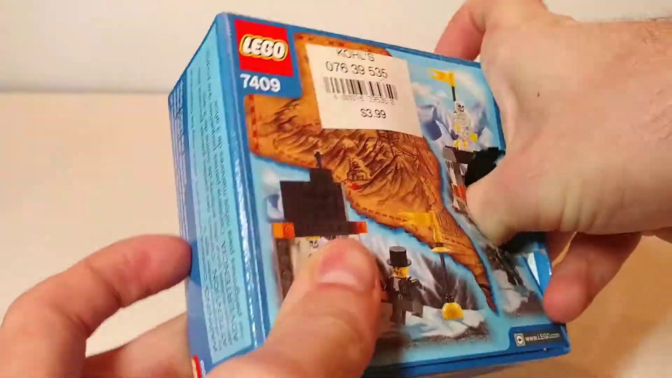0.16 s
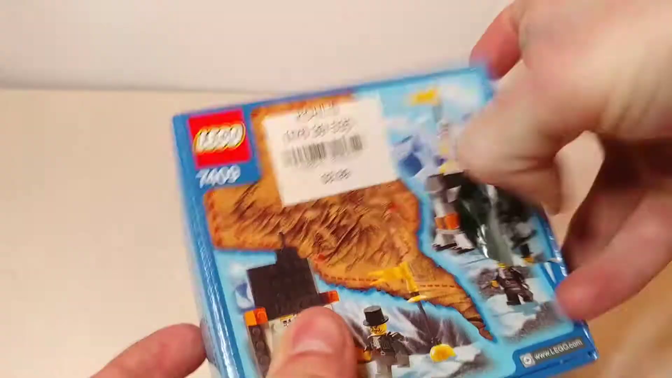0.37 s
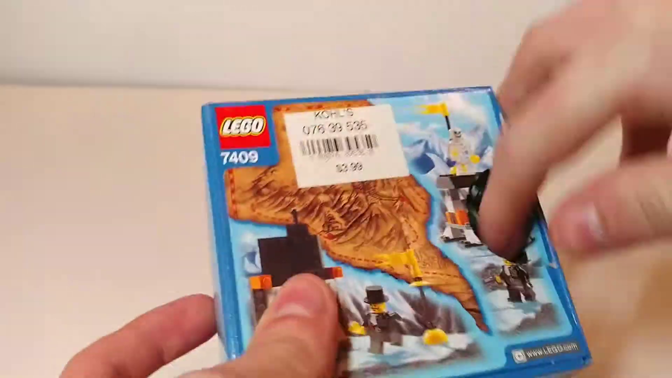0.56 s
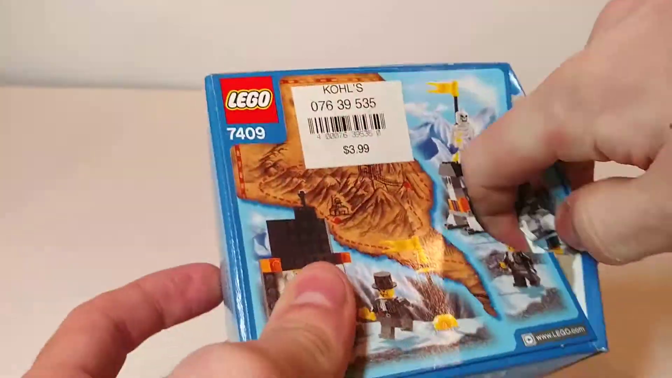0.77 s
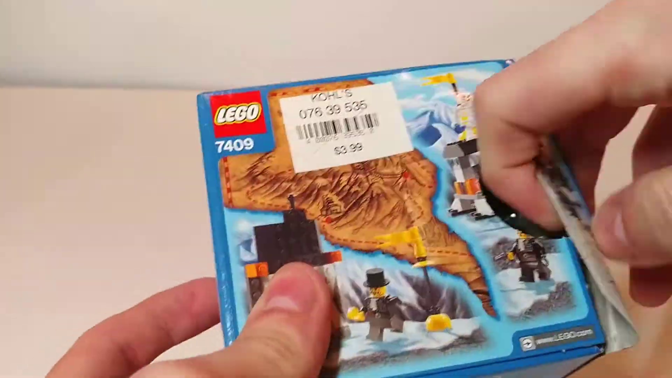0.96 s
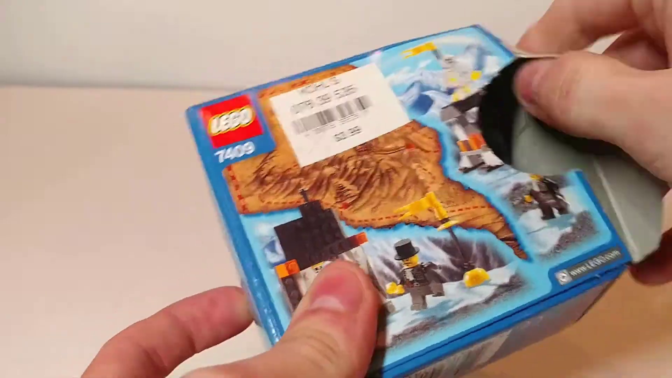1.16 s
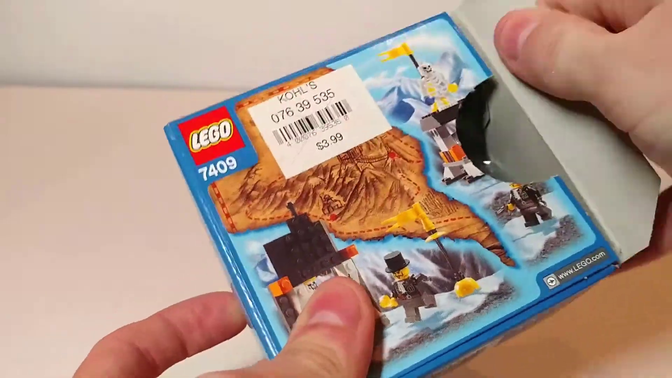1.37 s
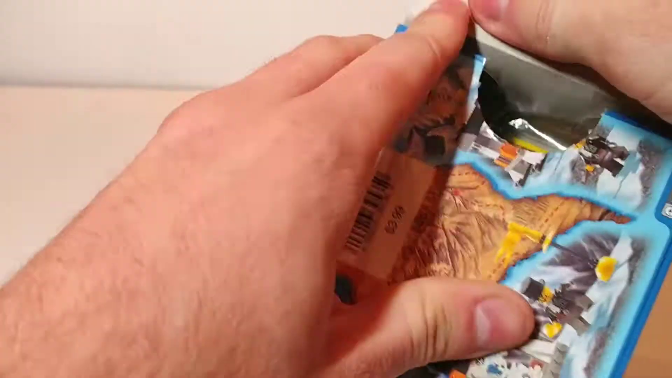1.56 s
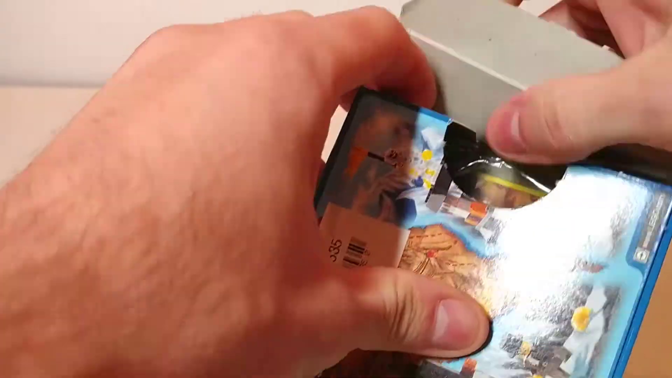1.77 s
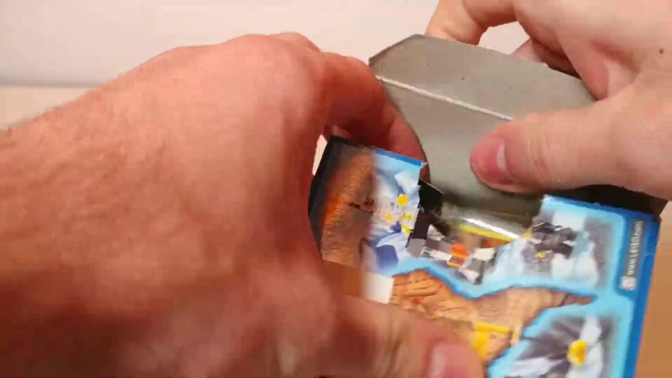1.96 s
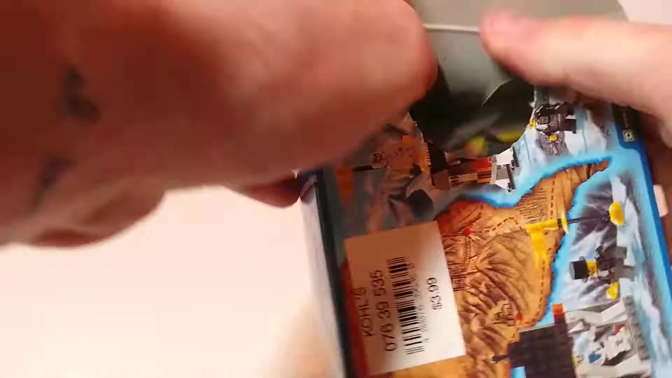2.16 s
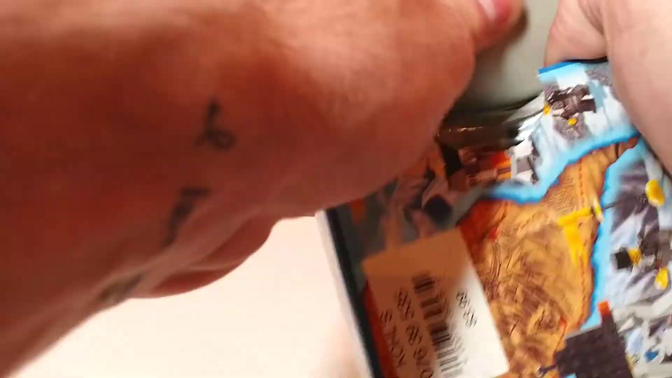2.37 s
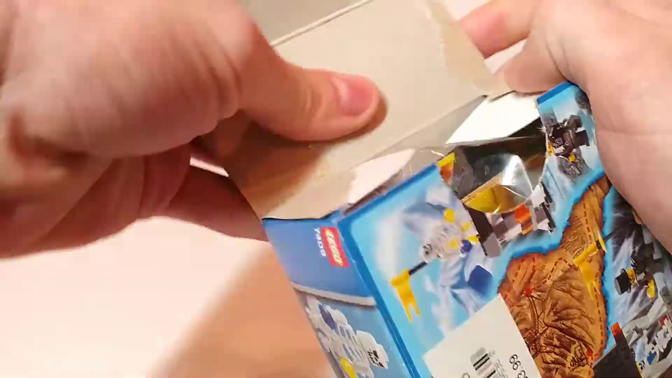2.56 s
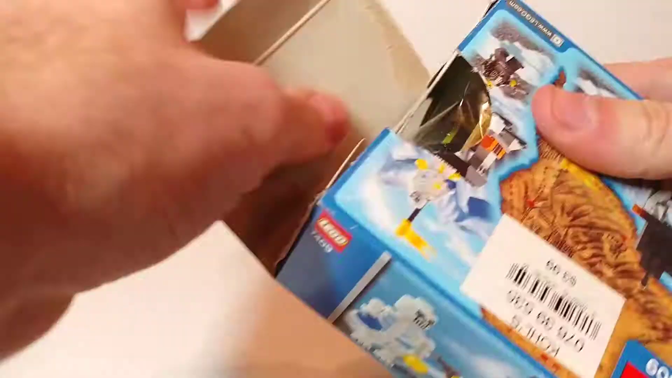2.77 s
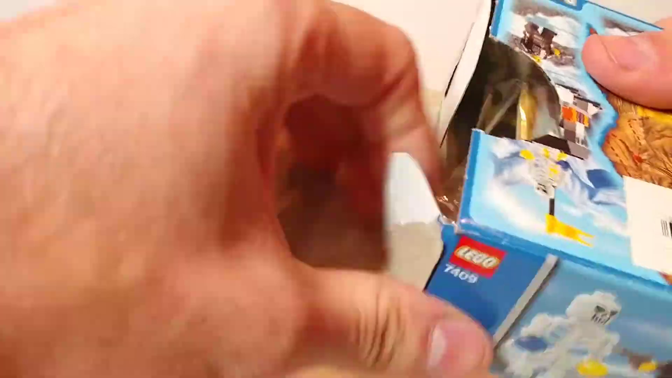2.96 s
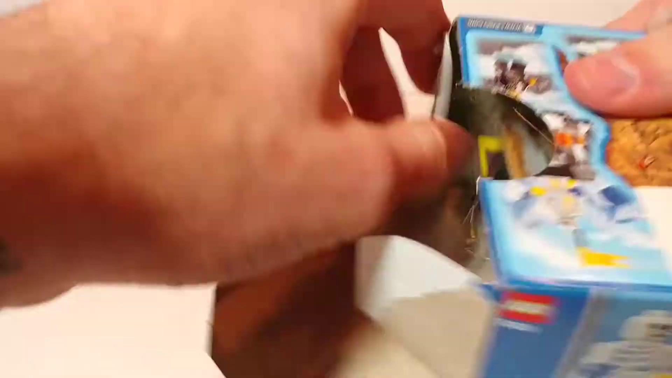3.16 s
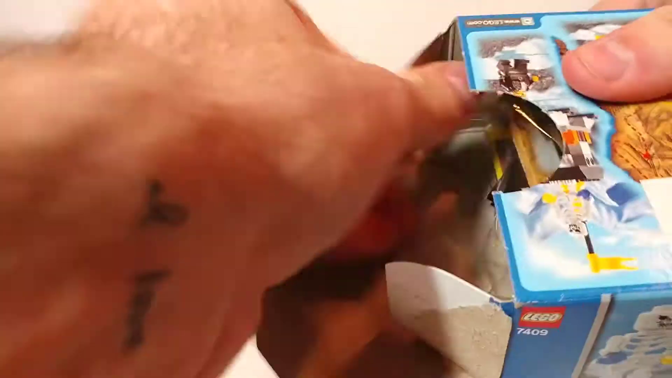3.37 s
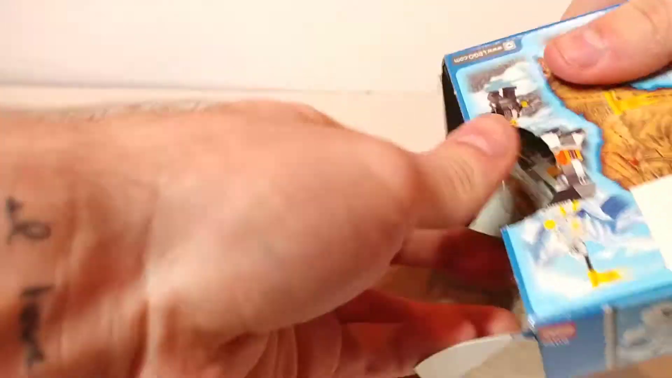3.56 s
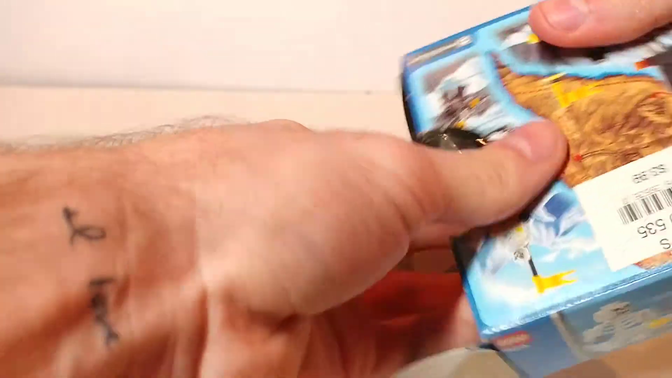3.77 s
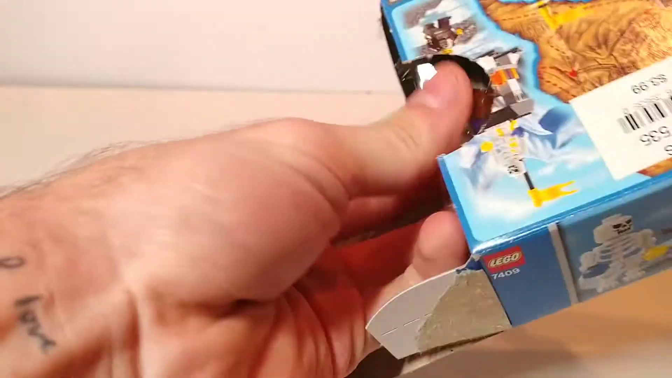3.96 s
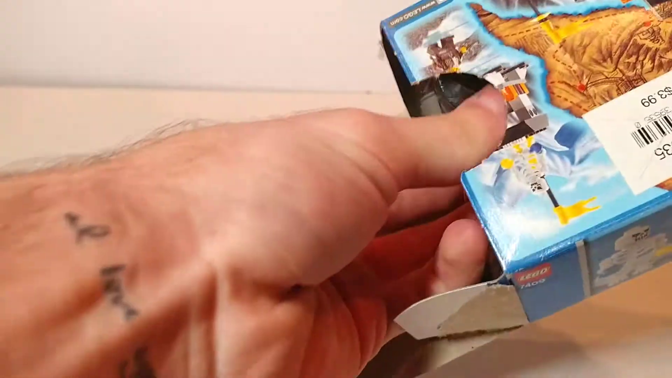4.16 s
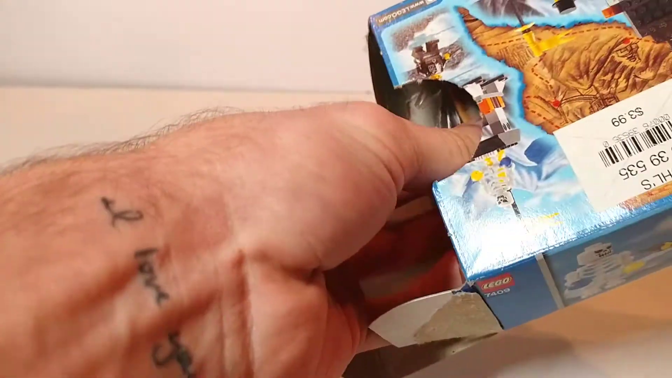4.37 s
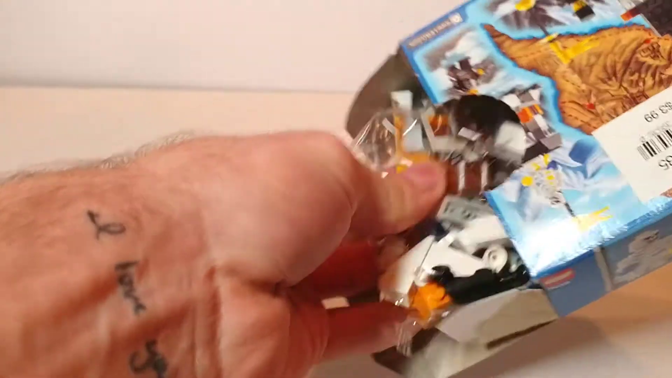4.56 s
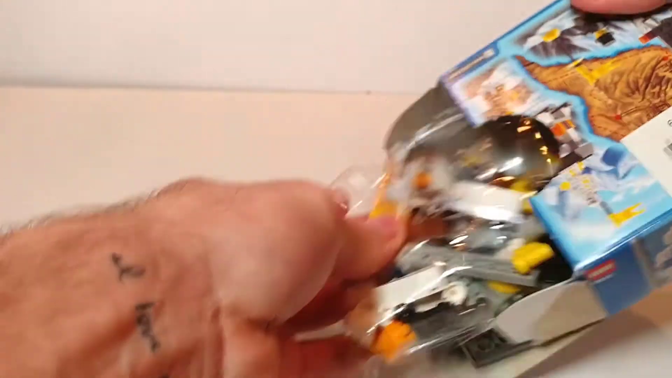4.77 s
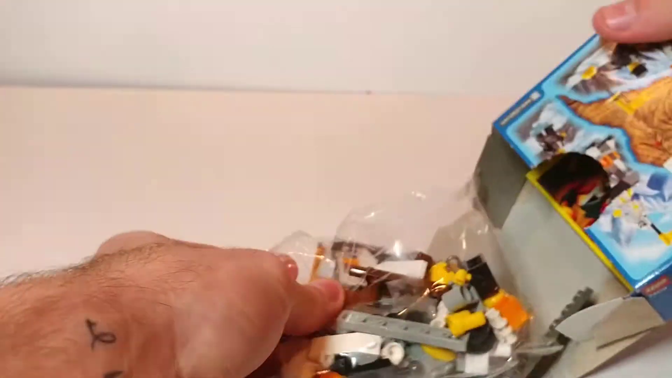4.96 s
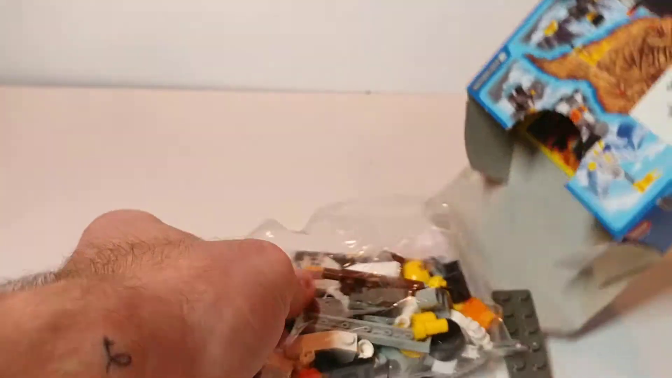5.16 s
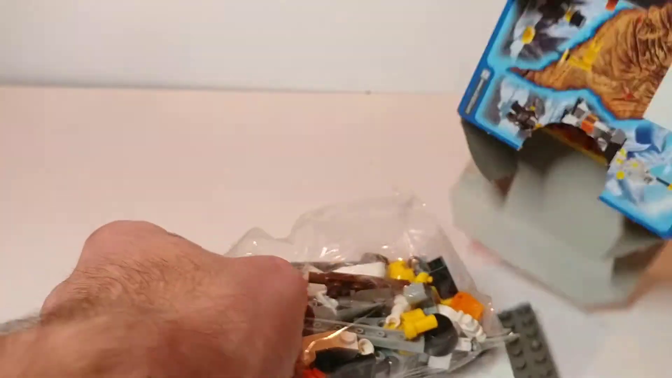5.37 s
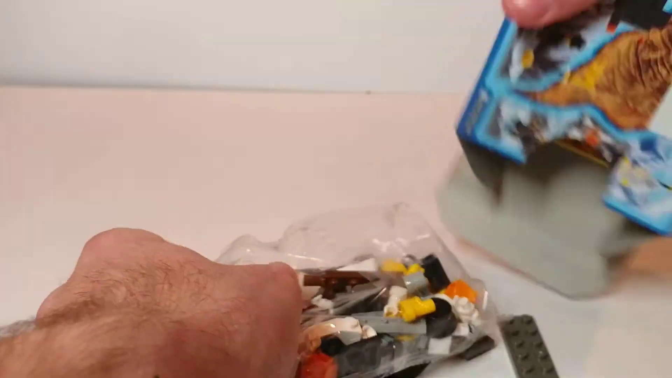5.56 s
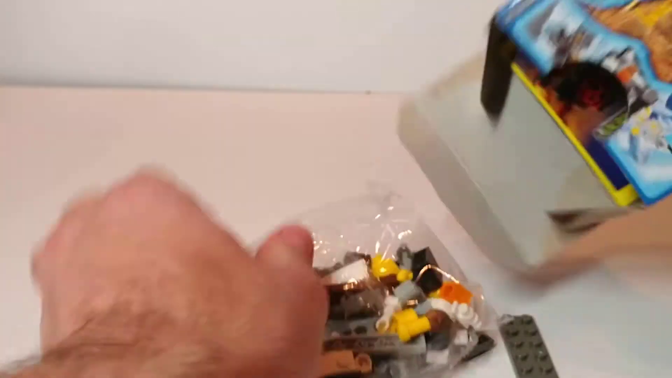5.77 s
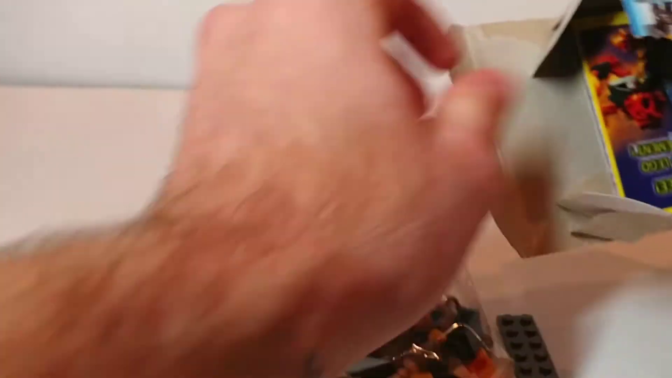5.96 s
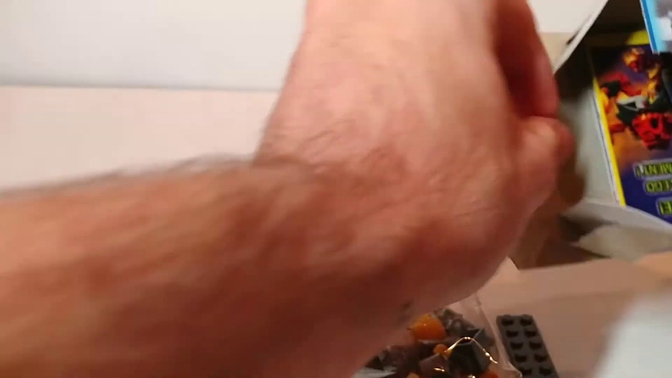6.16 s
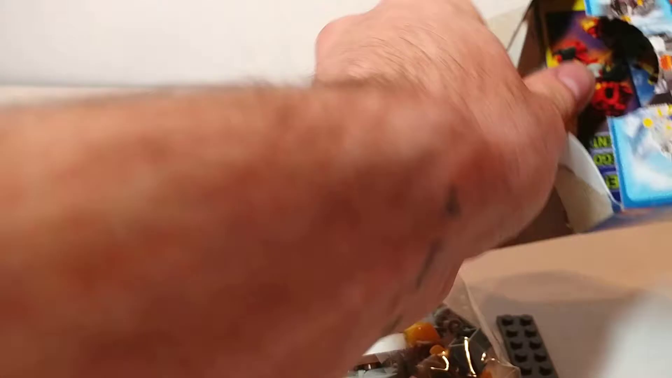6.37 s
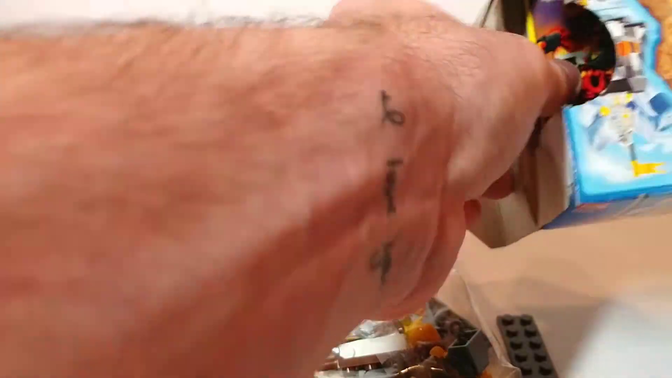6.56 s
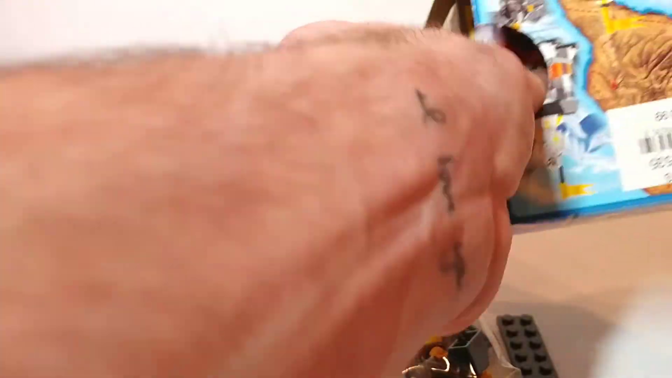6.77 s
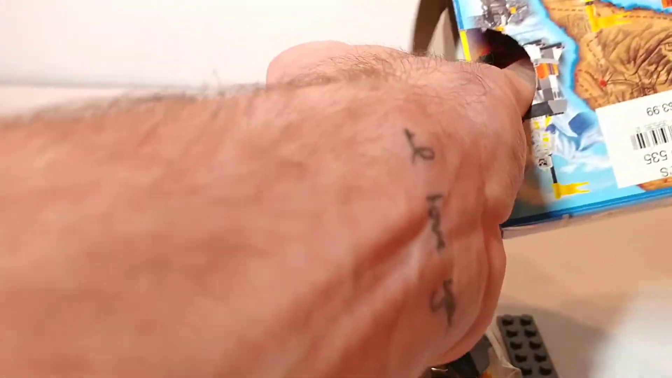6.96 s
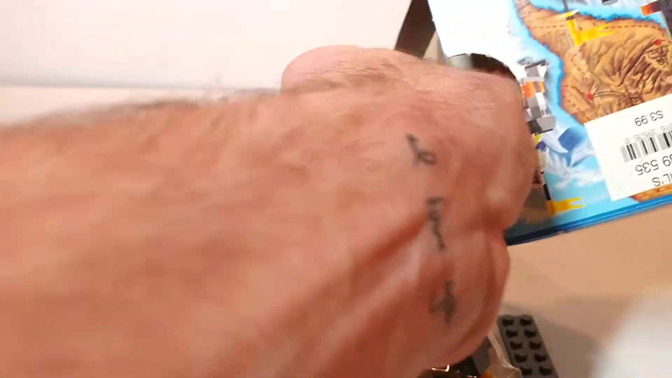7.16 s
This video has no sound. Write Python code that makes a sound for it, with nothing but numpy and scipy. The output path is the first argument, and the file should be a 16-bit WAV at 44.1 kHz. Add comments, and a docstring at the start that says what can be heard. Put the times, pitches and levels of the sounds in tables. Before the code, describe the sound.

Sharp card cracks and short tears, then hollow knocks, rustling film and clacking bricks, a loose piece skittering on a table, faint fingertip taps.

```python
"""Small room, at a table: a thumb punches open a small cardboard toy box close by; card creaks, tears, snaps.
Then a plastic bag of bricks is dragged out, a loose brick bounces, and fingers knock about in the box.
Contacts are noise bursts ringing resonances; scrapes and rustle are shaped random clicks; judder is random slips.
Blows, scrapes and rustle are levelled in three registers: body (hollow card), crack (stiff edges), tick (fibres, film).
A murmur of air lies underneath and drops to a deeper rumble when the bag comes."""
import sys
import numpy as np
from scipy import signal
from scipy.fft import rfft, irfft
from scipy.io import wavfile

SR = 44100
rng = np.random.default_rng(int(sys.argv[2]) if len(sys.argv) > 2 else 0)


def put_to_file(sound):
    """Save the sound as 16-bit audio at rate SR, in the file named by the first command-line argument."""
    columns = np.atleast_2d(sound).T  # one column per channel
    safe = np.clip(columns, -1, 1)
    whole_steps = np.round(safe * 32767)
    wavfile.write(sys.argv[1], SR, whole_steps.astype(np.int16))


N = 318137
TIME = np.arange(N) / SR


def undb(db):
    """Decibels to gain."""
    return 10 ** (np.asarray(db) / 20)


def unit(x):
    """Scale to rms 1."""
    return x / np.sqrt(np.mean(x ** 2))


def add(out, start_s, x):
    """Mix x into out from start_s."""
    i = max(int(start_s * SR), 0)
    out[:, i:i + x.shape[1]] += x[:, :max(N - i, 0)]


# bands of body, crack, tick: lower edge f/Hz, upper edge f/Hz
REGISTERS = [(130, 1500), (1500, 6000), (6000, 17000)]
SPLIT = [signal.butter(3, edges, "band", fs=SR, output="sos") for edges in REGISTERS]


def registers(x):
    """Split into body, crack and tick."""
    return [signal.sosfilt(sos, x) for sos in SPLIT]


def resonate(x, modes):
    """Ring a bank of damped resonances in parallel."""
    out = 0
    for hz, width_hz, db in modes:
        out = out + undb(db) * signal.lfilter(*signal.iirpeak(hz, hz / width_hz, SR), x)
    return out


def colour(x, points, size=4096):
    """Causal minimum-phase filter with the given spectrum, built by folding its cepstrum."""
    hz, db = np.transpose(points)
    bins_hz = np.arange(size // 2 + 1) * SR / size
    log_gain = np.log(undb(np.interp(np.log(bins_hz + 1), np.log(hz), db)))
    cepstrum = irfft(log_gain)[:size // 2]
    cepstrum[1:] *= 2
    response = irfft(np.exp(rfft(cepstrum, size)))
    return signal.fftconvolve(x, response[None], axes=1)[:, :N]


def ports(pair, split_hz=3400, width=0.93):
    """Two unrelated signals to left and right: long waves arrive alike, short ones differ."""
    side = width * signal.lfilter(*signal.butter(1, split_hz, "high", fs=SR), pair[1])
    return np.array([pair[0] + side, pair[0] - side])


def walk(rate):
    """Random drift, linear between `rate` normal values per second."""
    steps = rng.standard_normal(int(N / SR * rate) + 2)
    return np.interp(TIME * rate, np.arange(len(steps)), steps)


EASE_SHARE = 0.16  # share of a movement's length added to its fades


def swell(start_s, length_s, attack_s, release_s):
    """Gain of one movement: rises before start, holds, dies away; each fade time covers 20 dB."""
    ease_s = EASE_SHARE * length_s
    before = (start_s - TIME) / (attack_s + ease_s)
    after = (TIME - start_s - length_s) / (release_s + ease_s)
    return undb(-20 * np.clip(np.maximum(before, after), 0, 10))


def movements(rows, attack_s, release_s, body_db, tick_db):
    """Gains of body, crack and tick for a series of movements; a brighter one trades body for tick."""
    power = np.zeros((3, N))
    for start_s, length_s, db, bright_db in rows:
        levels_db = [db + body_db - bright_db, db, db + tick_db + bright_db]
        power += np.outer(undb(levels_db) ** 2, swell(start_s, length_s, attack_s, release_s) ** 2)
    return np.sqrt(power)


def blow(modes, levels_db, t60_s, spike, after_db, after_t60_s):
    """One contact: a sharp push, a burst of tiny slips and a weak after-rattle ring the modes."""
    t = np.arange(SR // 8) / SR
    envelope = undb(-60 * t / t60_s) + undb(after_db - 60 * t / after_t60_s)
    force = rng.standard_normal((2, len(t))) * envelope
    force[0, 0] += spike
    force[1, 2] += spike
    parts = registers(ports(resonate(force, modes)))
    share = np.sqrt(.005 * SR / len(t))  # levels are the energy spread over 5 ms
    return sum(share * undb(db) * unit(part) for db, part in zip(levels_db, parts))


def vary(modes, detune=0.05):
    """Every contact falls on another spot, so the resonances shift in pitch."""
    shifts = rng.standard_normal(len(modes))
    return [(hz * np.exp(detune * shift), width_hz, db) for (hz, width_hz, db), shift in zip(modes, shifts)]


def grains(rate, spread_db, octaves, q, hiss, count):
    """Tiny random clicks, many weak and a few strong, each ringing around its own pitch; plus hiss."""
    total = int(rate * N / SR)
    when, strength, pitch = rng.random((total, 3)).T
    at = (when * N).astype(int)
    size = undb(spread_db * np.minimum(-np.log(1 - strength), 3.5))
    pitch = np.log2(150) + pitch * np.log2(16000 / 150)
    out = np.zeros((2, N))
    for hz in np.geomspace(150, 16000, count):
        weight = size * np.exp(-((np.log2(hz) - pitch) / octaves) ** 2)
        clicks = [np.bincount(at, weight * rng.standard_normal(total), N) for _ in range(2)]
        out += resonate(np.array(clicks), [(hz, hz / q, 0)])
    return unit(out) + hiss * rng.standard_normal((2, N))


# air spectra before and after DEEPEN_S: f/Hz, relative density/dB per Hz
ROOM_EARLY = [(110, -1), (260, 20.5), (520, 9.5), (1590, -12), (2610, -12.5), (3490, -28.5), (9460, -47)]
ROOM_LATE = [(25, -12), (85, 12), (400, -13), (866, -37.5), (9220, -34), (13000, -52.5)]
EARLY_DB, LATE_DB = -52.5, -50
DEEPEN_S = 3.31  # the background drops to a deeper rumble


def background(sway_db=2):
    """A low murmur of air with faint hiss, later a deeper rumble; both sway a little."""
    late = np.clip((TIME - DEEPEN_S) / 0.017 + .5, 0, 1)
    air = ports(rng.standard_normal((2, N)), split_hz=300, width=.5)
    murmur = undb(EARLY_DB) * np.sqrt(1 - late) * unit(colour(air, ROOM_EARLY))
    rumble = undb(LATE_DB) * np.sqrt(late) * unit(colour(air, ROOM_LATE))
    return undb(sway_db * walk(20)) * (murmur + rumble)


# card resonances: f/Hz, width/Hz, level/dB
CARD_MODES = [(770, 240, -7.5), (1370, 1300, -2), (2490, 290, 3), (3830, 850, -12.5), (6940, 4100, -6),
              (12900, 7900, -6.5)]


def grip(level_db=-63, swell_db=5, damp_hz=4000, crackles_per_s=35, crackle_db=30):
    """While fingers work at the flap, skin rubs the card in fits and starts and single fibres crackle."""
    crackles = undb(crackle_db) * (rng.random(N) < crackles_per_s / SR)
    noise = ports(rng.standard_normal((2, N)) * (1 + crackles))
    rubbing = signal.lfilter(*signal.butter(1, damp_hz, fs=SR), noise)
    gain = undb(level_db + swell_db * walk(20)) * (TIME < DEEPEN_S)
    return gain * unit(resonate(rubbing, CARD_MODES))


# card tears or rubs on card: start t/s, length t/s, nominal level/dB, brightness/dB
STROKES = [(0.04, 0.014, -44, 4), (0.01, 0.19, -56.5, 1.5), (0.118, 0.015, -41.5, 5.5),
           (0.414, 0.024, -28, 3), (0.452, 0.024, -34.5, -2.5), (0.628, 0.047, -38.5, 4.5),
           (0.7, 0.1, -54.5, 0), (0.857, 0.0072, -52.5, 6.5), (0.955, 0.014, -32, 0),
           (1.055, 0.0036, -45.5, 0), (1.138, 0.014, -38, -1.5), (1.29, 0.059, -63.5, -4.5),
           (1.653, 0.027, -37.5, 4), (1.757, 0.036, -47, 1.5), (1.7, 0.205, -54.5, 2.5),
           (1.926, 0.05, -47, 7), (2.408, 0.032, -35, 9.5), (2.562, 0.0091, -35, 8),
           (2.625, 0.0028, -35, 2), (2.818, 0.014, -47.5, -0.5), (2.985, 0.023, -43.5, 5),
           (3.034, 0.0089, -30.5, 8.5), (3.06, 0.049, -52.5, 5.5), (3.18, 0.033, -42, 3.5),
           (3.234, 0.018, -39.5, 4)]
# torn card spectrum: f/Hz, relative density/dB per Hz
CARD_COLOUR = [(90, -13.5), (180, 6), (330, -7), (650, -6.5), (1150, -6), (1700, -16.5), (2650, -6.5),
               (3600, -15), (7000, -28), (15000, -29.5)]
# fade times before easing; body and tick relative to the stroke level
STROKE_ATTACK_S, STROKE_RELEASE_S, STROKE_BODY_DB, STROKE_TICK_DB = 0.0059, 0.013, -4, -1


def scrapes(catch_db=2.0):
    """Fibres catch and break in quick succession while each stroke swells and dies."""
    gains = movements(STROKES, STROKE_ATTACK_S, STROKE_RELEASE_S, STROKE_BODY_DB, STROKE_TICK_DB)
    breaking = ports(grains(rate=3500, spread_db=3.4, octaves=1.2, q=7, hiss=.4, count=24))
    fibres = registers(colour(breaking, CARD_COLOUR))
    strokes = sum(gain * unit(part) for gain, part in zip(gains, fibres))
    return undb(catch_db * walk(140)) * strokes


# fingers creak on glossy card: start t/s, length t/s, mean slip rate/(1/s), panel f/Hz, level/dB
CREAKS = [(0.192, 0.048, 130, 2490, -41), (7.128, 0.009, 330, 1530, -49.5)]


def creak(jitter=0.22, grit=0.19, attack_s=0.031, release_s=0.031):
    """Skin sticks and slips almost regularly, ringing one panel."""
    out = 0
    for start_s, length_s, rate, hz, db in CREAKS:
        turns = np.cumsum(rate * (1 + jitter * walk(90))) / SR
        slips = np.diff(np.floor(turns), prepend=0)
        rasp = grit * np.exp(-(turns % 1) / 0.2) * rng.standard_normal((2, N))
        panel = resonate(resonate(slips + rasp, [(hz, hz / 5, 0)]), CARD_MODES)
        out = out + undb(db) * unit(panel) * swell(start_s, length_s, attack_s, release_s)
    return out


# the card gives way: t/s, panel f/Hz, crack level/dB, tick re crack/dB
SNAPS = [(0.286, 770, -40, -10), (0.391, 2580, -33.5, 2.5), (0.3995, 2360, -28.5, -5),
         (0.414, 2720, -23, -8), (0.4314, 2270, -22.5, -12), (0.464, 3840, -29, -17),
         (0.4909, 3280, -20, -18), (0.5108, 3770, -28.5, -16), (0.573, 2440, -39, -27),
         (0.7231, 2320, -39, -2), (0.761, 1140, -35, -2.5), (0.9266, 2020, -21, -2),
         (0.9611, 900, -20, -8.5), (0.981, 2950, -33, -20), (1.2223, 2500, -45, 8.5),
         (1.3511, 3040, -17, -1.5), (1.372, 1180, -20, -4.5), (1.466, 2690, -39, -17),
         (1.639, 2230, -27, -15), (1.6695, 2600, -34, -6), (1.893, 2980, -48.5, 11),
         (1.935, 1900, -38.5, 7), (2.06, 2700, -30, -9), (2.2126, 3520, -27.5, 3.5),
         (2.2248, 2540, -25.5, -3), (2.539, 2120, -38.5, -4), (2.5707, 2920, -32, 6),
         (2.7305, 2940, -31.5, -7), (3.0391, 2700, -25.5, -18), (3.1186, 2530, -45.5, 10)]
# larger patches ring lower with more body; body equals crack at EVEN_PANEL_HZ
EVEN_PANEL_HZ, BODY_DB_PER_OCTAVE = 1210, 8.5


def snaps(panel_db=5, after_db=-18, after_t60_s=0.07):
    """Perforation and flaps snap; each time a patch of card of another size rings."""
    out = np.zeros((2, N))
    for start_s, hz, db, bright_db in SNAPS:
        modes = CARD_MODES + [(hz, hz / 4, panel_db)]
        body_db = db + BODY_DB_PER_OCTAVE * np.log2(EVEN_PANEL_HZ / hz)
        levels_db = [body_db, db, db + bright_db]
        add(out, start_s, blow(modes, levels_db, .016, spike=5, after_db=after_db, after_t60_s=after_t60_s))
    return out


# bag and fingers judder on the walls: start t/s, length t/s, hollow level/dB, thud re hollow/dB
JUDDERS = [(0.44, 0.052, -54.5, 12), (3.479, 0.025, -48.5, 9), (4.472, 0.19, -39, -15),
           (4.552, 0.045, -27.5, -21), (4.842, 0.15, -30, -9), (6.317, 0.047, -49.5, 6.5),
           (6.704, 0.049, -51.5, 1.5)]
# hollow box and wall resonances: f/Hz, width/Hz, level/dB
HOLLOW_MODE = [(921, 67, 0)]
WALL_MODES = [(172, 130, 0), (412, 63, 0.0069)]
RUB_ATTACK_S, RUB_RELEASE_S = 0.0068, 0.018  # before easing; rubs use them too


def judder(slips_per_s=500, soft_hz=1400):
    """Bag and fingers catch and slip unevenly; each soft slip rings the hollow box and thuds on its wall."""
    slips = ports((rng.random(N) < slips_per_s / SR) * rng.standard_normal((2, N)))
    slips = signal.lfilter(*signal.butter(2, soft_hz, fs=SR), slips)
    hollow = unit(resonate(slips, HOLLOW_MODE))
    wall = unit(resonate(slips, WALL_MODES))
    out = 0
    for start_s, length_s, db, thud_db in JUDDERS:
        gain = undb(db) * swell(start_s, length_s, RUB_ATTACK_S, RUB_RELEASE_S)
        out = out + gain * (hollow + undb(thud_db) * wall)
    return out


# dull fingertips, bright bricks on the box: t/s, panel f/Hz, body level/dB, crack re body/dB
KNOCKS = [(0.456, 850, -38, -15), (3.9213, 507, -21, -11.5), (4.1358, 705, -18.5, -7.5),
          (4.212, 724, -30, -7), (4.2522, 530, -33.5, -8.5), (4.417, 890, -28.5, -1.5),
          (4.695, 860, -31, -16), (4.882, 940, -17.5, -12.5), (5.033, 1140, -20.5, -13),
          (5.2014, 1070, -25, -6.5), (5.935, 940, -42, -18.5), (6.357, 413, -35.5, -16.5),
          (6.728, 900, -38.5, -18), (6.77, 890, -36.5, -16), (6.906, 927, -28.5, -19),
          (7.196, 930, -23, -16)]
# box resonances: f/Hz, width/Hz, level/dB
BOX_MODES = [(448, 69, 1.5), (665, 70, -6.5), (872, 55, 1.5), (1200, 130, -17), (2500, 940, -6.5),
             (8660, 1700, -5.5)]


def knocks(panel_db=2, tick_db=-9, after_db=-14):
    """Soft blows ring the box air and thud on damped walls, which radiate little below their own pitch."""
    out = np.zeros((2, N))
    for start_s, hz, body_db, bright_db in KNOCKS:
        modes = BOX_MODES + [(hz, hz / 5, panel_db)]
        crack_db = body_db + bright_db
        levels_db = [body_db, crack_db, crack_db + tick_db]
        thud = blow(modes, levels_db, .022, spike=11, after_db=after_db, after_t60_s=.06)
        highpass = signal.butter(4, min(hz * .6, 320), "high", fs=SR)
        add(out, start_s, signal.lfilter(*highpass, thud))
    return out


# bag is tugged, slides out, settles: start t/s, length t/s, nominal level/dB, brightness/dB
TUGS = [(3.472, 0.019, -33, 2.5), (3.57, 0.1, -39.5, 2), (3.88, 0.24, -39, 0.5), (4.23, 0.23, -54.5, -6.5),
        (4.396, 0.016, -31.5, 1.5), (4.46, 0.22, -35, 2.5), (4.545, 0.068, -30.5, 1.5),
        (4.72, 0.21, -40.5, -1), (4.862, 0.14, -27.5, 1.5), (5.05, 0.085, -34.5, 2.5),
        (5.175, 0.05, -33, 1.5), (5.775, 0.016, -48.5, 5)]
TUG_ATTACK_S, TUG_RELEASE_S, TUG_BODY_DB, TUG_TICK_DB = 0.019, 0.076, -3, 2
# fingers rub inside the box: start t/s, length t/s, nominal level/dB, brightness/dB
RUBS = [(5.92, 0.046, -58, -5.5), (6.0, 0.15, -53.5, 0.5), (6.425, 0.043, -46.5, 0), (6.83, 0.15, -60, -5),
        (7.125, 0.024, -40.5, 0)]
RUB_BODY_DB, RUB_TICK_DB = 1, 3
# bag spectrum: f/Hz, relative density/dB per Hz
BAG_COLOUR = [(130, -7), (700, -9), (950, -4.5), (1400, -11), (2800, -6), (3800, -11), (7000, -23.5),
              (9200, -16.5), (10600, -21)]
HOLD_DB = -70  # hands holding bag and box rustle faintly between movements


def rustle(tug_hollow_db=-7, rub_hollow_db=3, surge_db=2.0):
    """Film, bricks and rubbing fingers move in small jerks; the hollow box rings with their low end."""
    crinkle = grains(rate=4500, spread_db=3.4, octaves=.7, q=18, hiss=.2, count=44)
    clatter = grains(rate=520, spread_db=3.3, octaves=.5, q=32, hiss=0, count=40)
    jostle = ports(crinkle + clatter)
    body, crack, tick = map(unit, registers(colour(jostle, BAG_COLOUR)))
    hollow = unit(registers(resonate(jostle, BOX_MODES))[0])
    tugs = movements(TUGS, TUG_ATTACK_S, TUG_RELEASE_S, TUG_BODY_DB, TUG_TICK_DB)
    rubs = movements(RUBS, RUB_ATTACK_S, RUB_RELEASE_S, RUB_BODY_DB, RUB_TICK_DB)
    rubs = np.hypot(rubs, undb(HOLD_DB) * (TIME > DEEPEN_S))
    out = 0
    for gains, hollow_db in ((tugs, tug_hollow_db), (rubs, rub_hollow_db)):
        parts = unit(body + undb(hollow_db) * hollow), crack, tick
        out = out + sum(gain * part for gain, part in zip(gains, parts))
    return undb(surge_db * walk(60)) * out


# film creases flip: t/s, crack level/dB, tick re crack/dB
CLICKS = [(3.572, -43.5, 21), (3.8848, -26.5, 5.5), (4.3934, -28, 7.5), (4.4985, -30, 3),
          (4.6408, -25.5, -4), (4.6995, -33, 9.5), (4.7725, -28.5, 1), (4.9161, -27, 8), (4.9748, -22, -10),
          (5.0577, -35.5, 5), (5.0899, -25, 2.5), (5.183, -21, 7), (5.258, -28, 3), (5.7605, -35.5, 8),
          (5.8494, -56, 22), (6.083, -37, -1), (6.2669, -34, 10.5)]
# bag resonances before detuning: f/Hz, width/Hz, level/dB
BAG_MODES = [(934, 420, 3), (2680, 770, 12.5), (4100, 360, 4.4), (5360, 1900, 8.1), (8610, 900, 18.2),
             (12000, 1900, 3)]
BAG_BODY_DB = -9  # re crack


def creases():
    """Creases of the film flip: hard, very short contacts ring the bag."""
    out = np.zeros((2, N))
    for start_s, db, bright_db in CLICKS:
        levels_db = [db + BAG_BODY_DB, db, db + bright_db]
        add(out, start_s, blow(vary(BAG_MODES), levels_db, .012, spike=6, after_db=-20, after_t60_s=.05))
    return out


# taut film slides over card: start t/s, length t/s, level/dB
SIZZLES = [(3.574, 0.16, -33.5), (5.17, 0.044, -35)]
SIZZLE_HZ, SIZZLE_WIDTH_HZ = 8970, 910


def sizzle(attack_s=.01, release_s=0.017, flutter_db=6):
    """Irregular little slips of the film ping one high resonance."""
    slips = ports(rng.standard_normal((2, N))) * undb(flutter_db * walk(150))
    mode = [(SIZZLE_HZ, SIZZLE_WIDTH_HZ, 0)]
    gain = sum(undb(db) * swell(start_s, length_s, attack_s, release_s) for start_s, length_s, db in SIZZLES)
    return gain * unit(resonate(resonate(slips, mode), mode))


# bricks clack inside the bag: t/s, brick f/Hz, crack level/dB
CLACKS = [(3.6048, 3900, -24.5), (4.4024, 2400, -23.5), (4.5789, 3400, -22.5), (4.5937, 1550, -25),
          (4.987, 2870, -17), (5.1, 2780, -23.5), (5.2472, 3300, -25)]


def clacks(ring_db=20, tick_db=-7):
    """Bricks hit each other inside the bag; each contact adds one sharp brick resonance to the bag's."""
    out = np.zeros((2, N))
    for start_s, hz, db in CLACKS:
        modes = vary(BAG_MODES) + [(hz, hz / 10, ring_db)]
        levels_db = [db + BAG_BODY_DB, db, db + tick_db]
        add(out, start_s, blow(modes, levels_db, .012, spike=6, after_db=-20, after_t60_s=.05))
    return out


# loose brick bounces on the table: t/s, crack level/dB
BOUNCES = [(5.435, -21.5), (5.4378, -22.5), (5.489, -34), (5.5105, -20), (5.5407, -35), (5.5565, -26.5),
           (5.5712, -34.5)]
# brick resonances, detuned per bounce: f/Hz, width/Hz, level/dB
BRICK_MODES = [(860, 470, -6.5), (3200, 580, -0.5), (4580, 530, 2.5), (6200, 490, -10), (8370, 350, -3.5)]


def bounces(body_db=-17, tick_db=-3):
    """Each impact on the table rings the loose brick."""
    out = np.zeros((2, N))
    for start_s, db in BOUNCES:
        levels_db = [db + body_db, db, db + tick_db]
        add(out, start_s, blow(vary(BRICK_MODES), levels_db, .01, spike=7, after_db=-20, after_t60_s=.09))
    return out


SKID_START_S, SKID_LENGTH_S, SKID_DB, SKID_RELEASE_S = 5.44, 0.15, -43, 0.03


def skid(attack_s=0.023):
    """The edges of the loose brick chatter on the table and ring its modes."""
    chatter = ports(grains(rate=2000, spread_db=2.8, octaves=1.5, q=9, hiss=.45, count=16))
    gain = undb(SKID_DB) * swell(SKID_START_S, SKID_LENGTH_S, attack_s, SKID_RELEASE_S)
    return gain * unit(resonate(chatter, BRICK_MODES))


def room(x, t60_s=0.08, wet_db=-17, damp_hz=6000):
    """The table and near walls return a short, duller tail."""
    t = np.arange(SR // 3) / SR
    tail = rng.standard_normal((2, len(t))) * np.exp(-np.log(1000) * t / t60_s) * (t > .003)
    tail = signal.lfilter(*signal.butter(1, damp_hz, fs=SR), tail)
    echo = signal.fftconvolve(x, unit(tail) / np.sqrt(len(t)), axes=1)[:, :N]
    return x + undb(wet_db) * echo


# a dip near 10.7 kHz dulls the top treble of bag, bricks, knocks and judder: f/Hz, level/dB
TREBLE_DIP = [(9600, 0), (10700, -13.5), (12600, -5)]


def scene():
    """Box, bag and bricks in a small room."""
    card = grip() + scrapes() + creak() + snaps()
    plastic = rustle() + creases() + sizzle() + clacks() + bounces() + skid()
    contents = colour(judder() + knocks() + plastic, TREBLE_DIP)
    return room(card + contents) + background()


TOP_HZ = 15800


def record(dry):
    """Round the highest peaks and cut the top."""
    rounded = np.tanh(dry)
    return signal.sosfilt(signal.ellip(8, .2, 70, TOP_HZ, fs=SR, output="sos"), rounded)


dry = scene()
out = record(dry)
put_to_file(out)
```